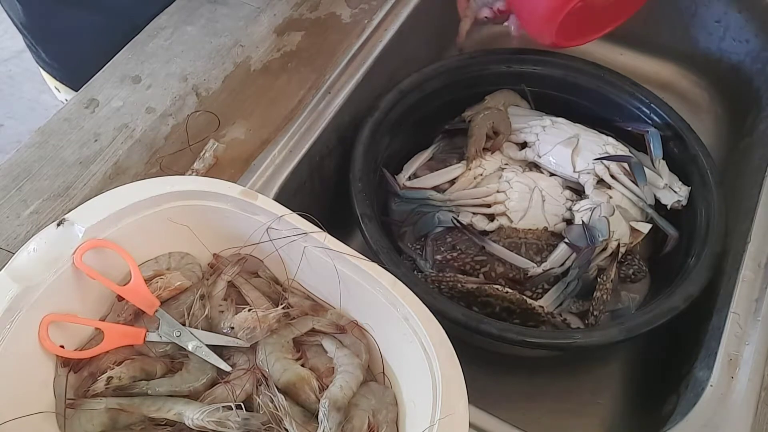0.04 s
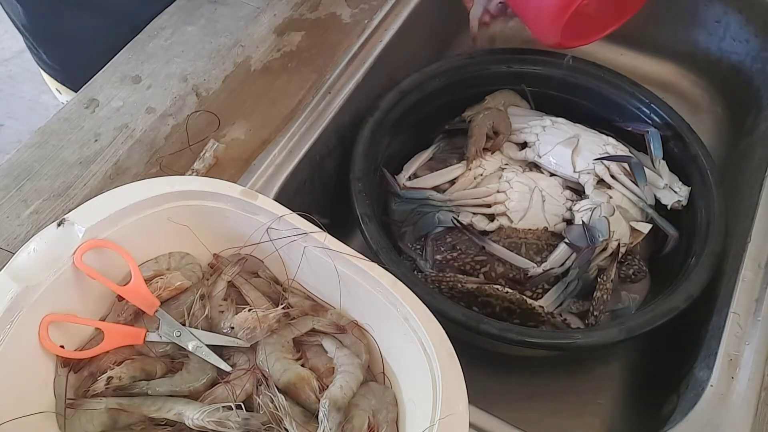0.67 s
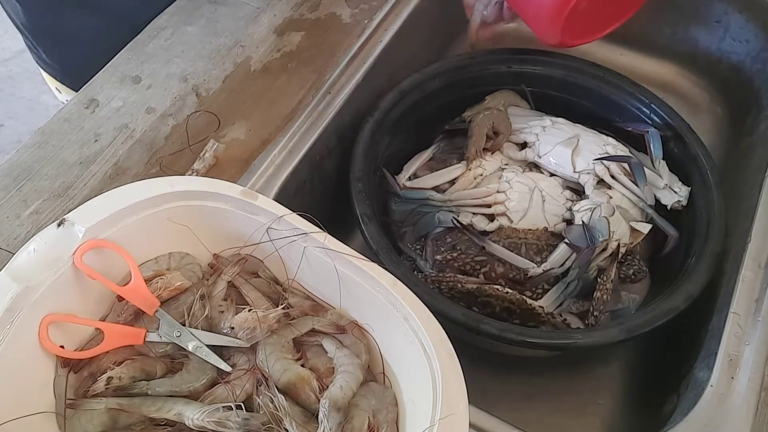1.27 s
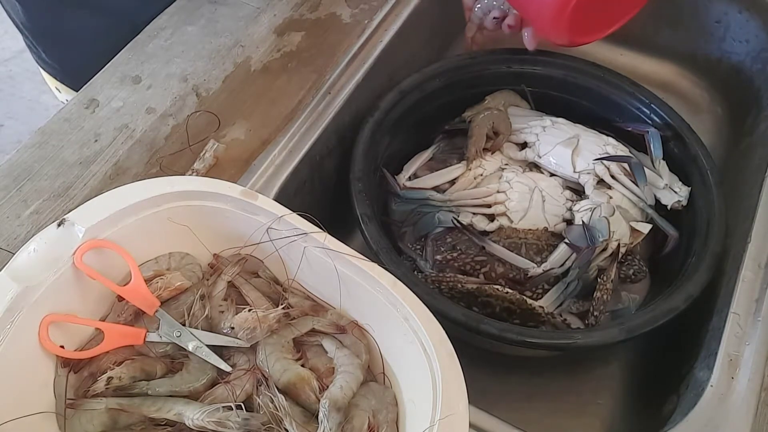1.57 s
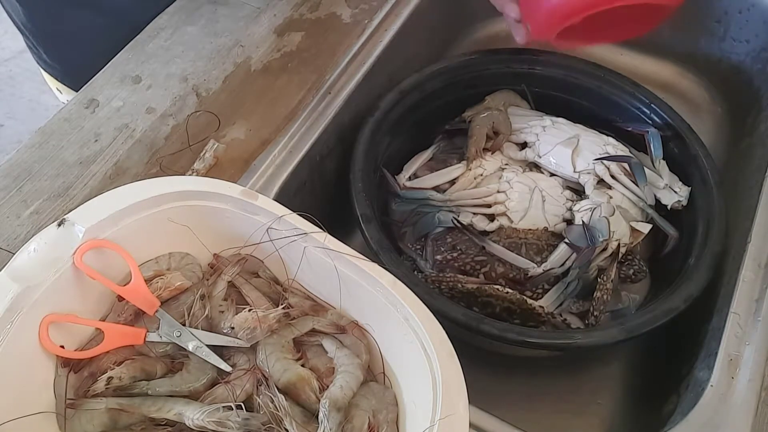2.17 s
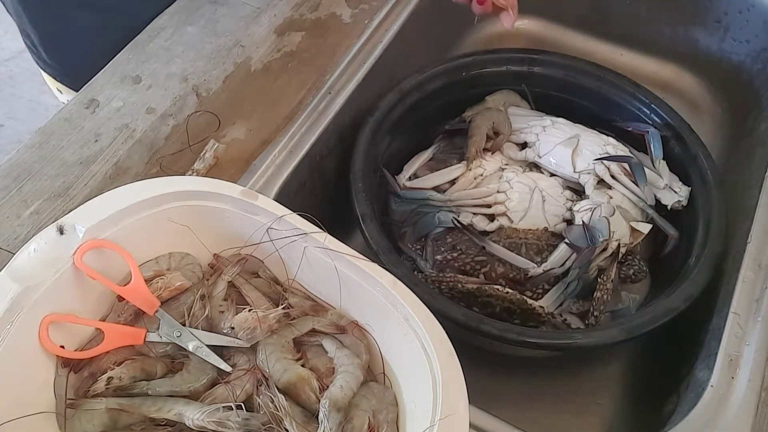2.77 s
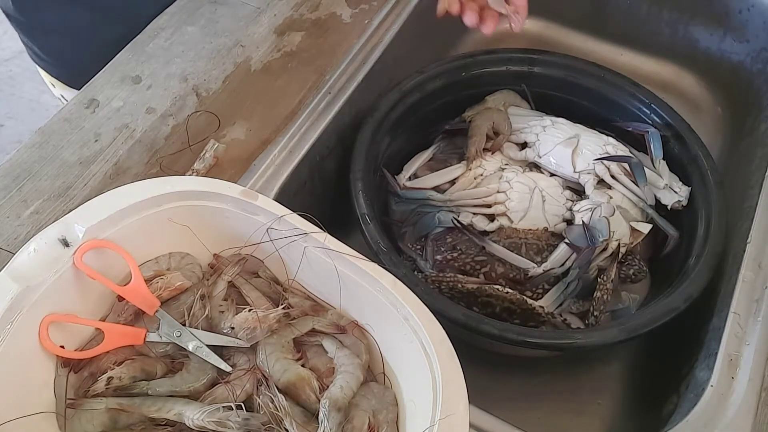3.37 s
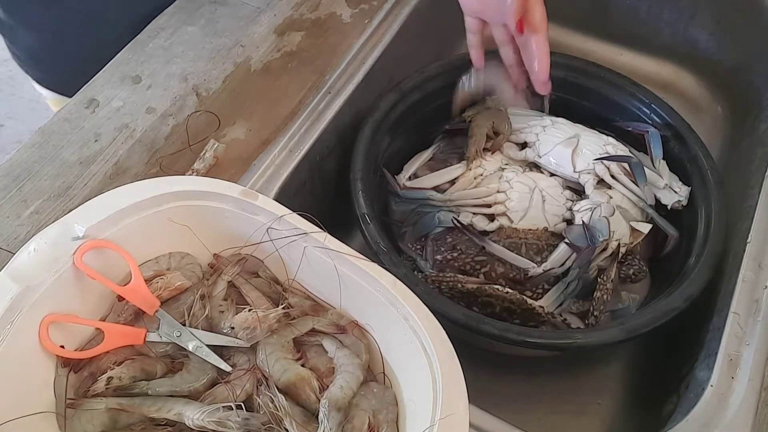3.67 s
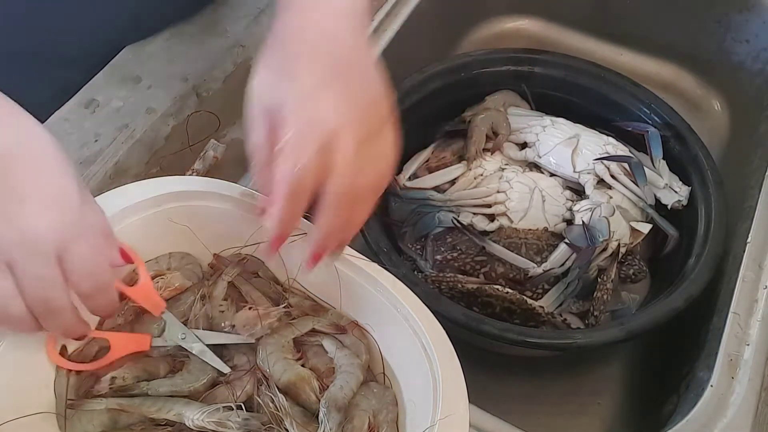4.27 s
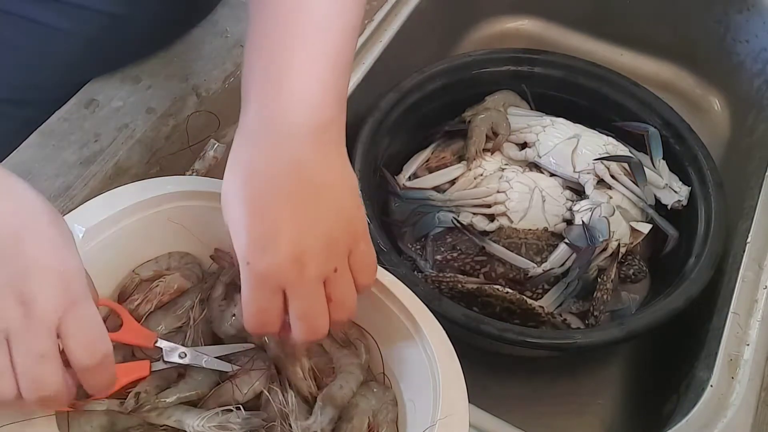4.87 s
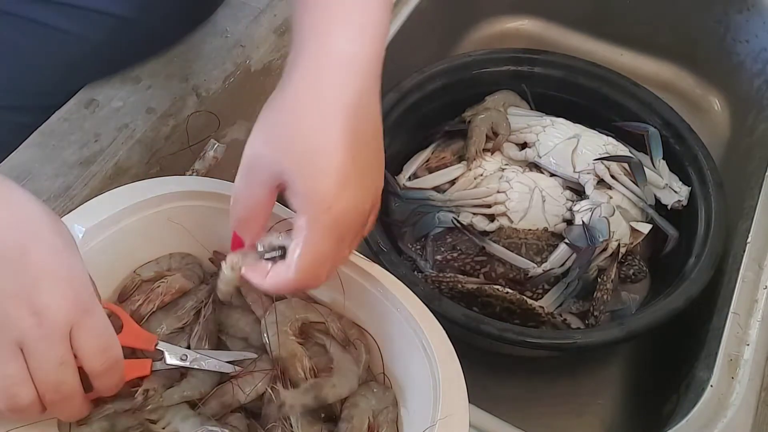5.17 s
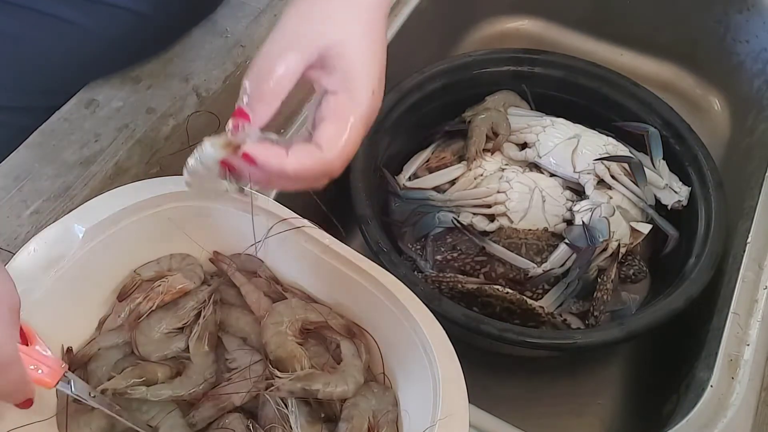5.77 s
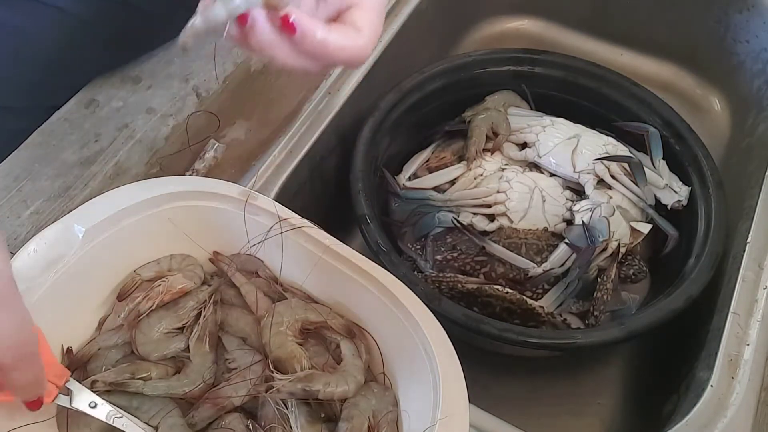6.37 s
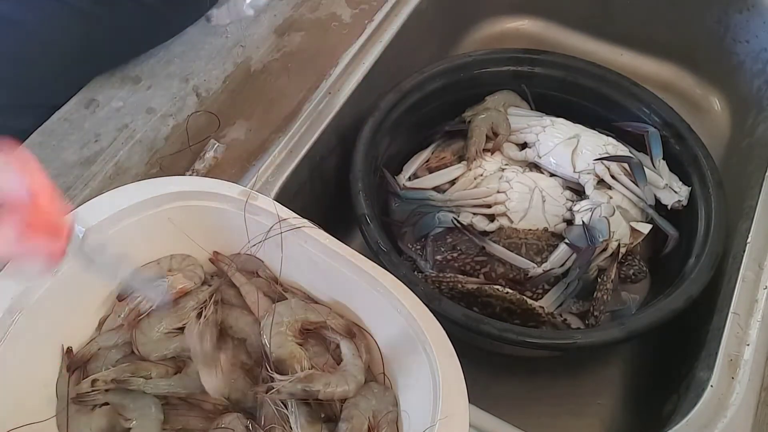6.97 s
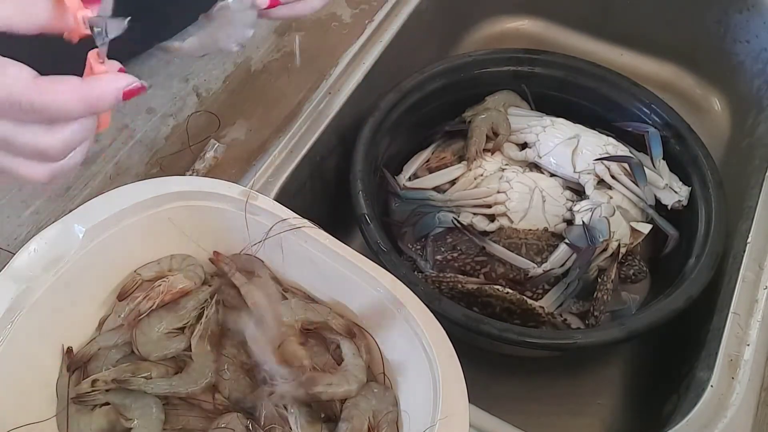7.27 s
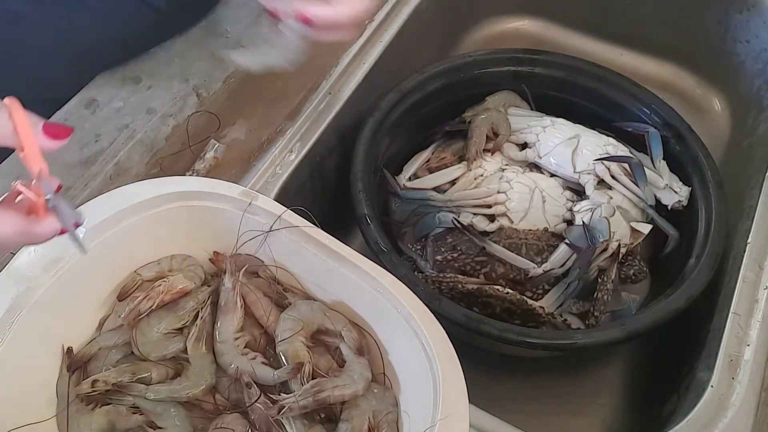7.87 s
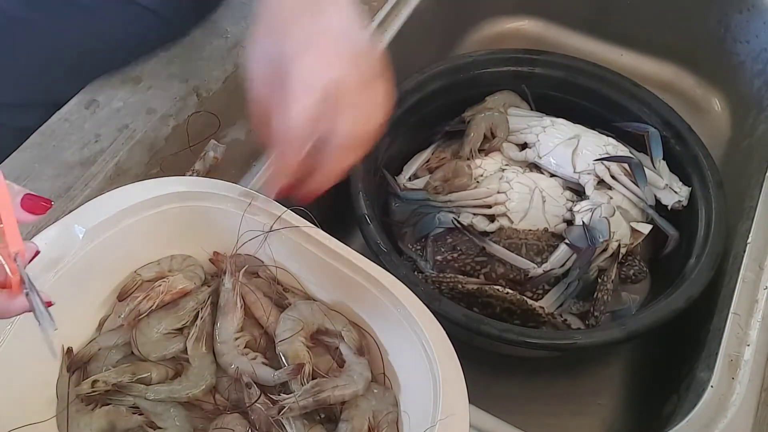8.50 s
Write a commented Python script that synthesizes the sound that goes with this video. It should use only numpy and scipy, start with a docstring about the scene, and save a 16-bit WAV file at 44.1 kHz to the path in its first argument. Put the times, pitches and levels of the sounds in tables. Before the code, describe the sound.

Water is poured in short gushes over a bowl of crabs, splashing, dripping and drumming in a steel sink. The plastic scoop is set down with a hollow, bouncing clatter. Hands then pick through wet shellfish, making soft crackles, slaps and faint squeaks, while scissors tap a plastic tub and the basin booms softly. It is heard close up in a quiet, half-open kitchen.

```python
"""Water drums and splashes in a steel sink, poured in gushes from a plastic scoop. The scoop is set down with a
hollow clatter. Then hands pick through wet shellfish in a plastic tub: shells crackle and slap, fingers rub,
scissors tap the tub, the basin booms softly when nudged. Steel and plastic ring in damped modes, drops ring as
bubbles, spray and shells are many tiny impacts. Close phone, half-open kitchen."""
import sys
import numpy as np
from scipy import signal
from scipy.fft import rfft, irfft
from scipy.io import wavfile
from scipy.ndimage import uniform_filter1d

SR = 44100
rng = np.random.default_rng(int(sys.argv[2]) if len(sys.argv) > 2 else 0)


def int16_out(signal):
    """Quantize to a 16-bit WAV file."""
    q = np.round(np.clip(np.atleast_2d(signal).T, -1, 1) * 32767)
    wavfile.write(sys.argv[1], SR, q.astype(np.int16))


N = 380890
T = np.arange(N) / SR
RING_T = T[:SR // 2]
POUR_END_S = 2.4

# water gushes: (time [s], length [s], drumming [dB], spray [dB], basin boom [dB])
GUSHES = [(0.01, 0.084, -44, -50, -39), (0.19, 0.11, -42, -45.5, -32.5), (0.38, 0.07, -42, -64, -35.5),
          (0.54, 0.046, -40, -53.5, -34), (0.682, .2, -40.5, -66.5, -28.5), (0.773, 0.012, -45, -41, -39),
          (1.018, 0.1, -44, -64.5, -42), (1.216, .09, -49, -55.5, -43), (1.359, 0.034, -46, -63.5, -39.5),
          (1.523, 0.036, -42, -56, -43.5), (1.79, 0.037, -48.5, -65.5, -49), (1.915, 0.11, -44.5, -73, -49),
          (2.144, 0.035, -37.5, -51, -42), (2.25, 0.16, -38.5, -61, -44.5)]
# steel sink floor: (frequency [Hz], level [dB], t60 [s])
FLOOR_MODES = [(168, -13.5, .15), (236, -14.5, 0.31), (279, 2.5, 0.34), (270, -0.5, .15), (329, -6, 0.13),
               (391.7, -9, 0.17), (431, -13, 0.41)]
# wet shell noise: (frequency [Hz], level [dB])
SHELL_SPECTRUM = [(120, -37.5), (280, -9.5), (430, -8.5), (620, -13), (1100, -6), (1800, -4.5),
                  (2600, -1.5), (3400, -5.5), (4500, -6), (6000, -13), (9000, -15.5), (14000, -21),
                  (16000, -27.5)]
# plastic tub walls: (frequency [Hz], level [dB], t60 [s])
TUB_MODES = [(310, -11, 0.18), (469, -3, 0.12), (686, -2, 0.11), (1630, -0.5, 0.032), (1820, -1.5, 0.092),
             (1938, 0, 0.063), (2000, -11.5, 0.11), (2070, -2, 0.11), (2420, -11.5, 0.14),
             (2695, -1, 0.053), (2960, -13, 0.097), (4410, -4, 0.038), (5220, -27, 0.032)]


def undb(db):
    """Decibels to gain."""
    return 10 ** (np.asarray(db) / 20)


def unit(x):
    """Scale to rms 1."""
    return x / np.sqrt(np.mean(x ** 2))


def pan(db):
    """Stereo gains for a left-minus-right level."""
    return undb(np.array([[.5], [-.5]]) * db)


def add(out, time_s, x):
    """Mix x into out at time_s."""
    i = int(time_s * SR)
    out[:, i:i + x.shape[1]] += x[:, :N - i]


def convolve(x, response):
    """Apply an impulse response, keeping the length."""
    return signal.fftconvolve(np.atleast_2d(x), np.atleast_2d(response), axes=1)[:, :x.shape[-1]]


def colour(x, spectrum):
    """Minimum-phase filter through (Hz, dB) points; white noise keeps its power."""
    size = 4096
    hz, db = np.transpose(spectrum)
    bins_hz = np.fft.rfftfreq(size, 1 / SR)
    gain = unit(undb(np.interp(np.log(bins_hz + 1), np.log(hz), db)))
    cepstrum = irfft(np.log(gain))[:size // 2]
    cepstrum[1:] *= 2
    return convolve(x, irfft(np.exp(rfft(cepstrum, size))))


def band(x, lo_hz, hi_hz):
    """Band-pass."""
    sos = signal.butter(3, [lo_hz, min(hi_hz, SR * 4 / 9)], "band", fs=SR, output="sos")
    return signal.sosfilt(sos, x)


def fade(t60_s):
    """Exponential decay."""
    return np.exp(-np.log(1000) * RING_T / t60_s)


def burst(t60_s):
    """Decaying stereo noise."""
    return rng.standard_normal((2, len(RING_T))) * fade(t60_s)


def ring(modes, spread_db=0, detune=0):
    """Struck body, peak 1; mode levels and pitches can vary per blow."""
    y = 0
    for hz, db, t60_s in modes:
        level_draw, pitch_draw = rng.standard_normal(2)
        tone = np.sin(2 * np.pi * hz * (1 + detune * pitch_draw) * RING_T)
        y = y + undb(db + spread_db * level_draw) * fade(t60_s) * tone
    return y / np.abs(y).max()


def walk(rate_hz):
    """Slow random wander, rms 1."""
    hold = int(SR / rate_hz)
    steps = np.repeat(rng.standard_normal(N // hold + 1), hold)
    return unit(uniform_filter1d(steps, hold)[:N])


def grains(per_s, scatter_db):
    """Random tiny impacts, most weak, a few strong."""
    size = undb(scatter_db * np.minimum(rng.exponential(size=N), 4))
    return unit((rng.random(N) < per_s / SR) * size * rng.choice([-1, 1], N))


def crackle(per_s, scatter_db, t60_s, patchy_db):
    """Impacts as stereo noise puffs; each band adds its own impacts and level wander."""
    edges_hz = [100, 900, 1600, 2800, 5000, 9000, 17000]
    pole = np.exp(-2 * np.log(1000) / (t60_s * SR))
    shared, out = grains(per_s, scatter_db) ** 2, 0
    for lo_hz, hi_hz in zip(edges_hz, edges_hz[1:]):
        power = signal.lfilter([1], [1, -pole], shared + grains(per_s, scatter_db) ** 2)
        noise = rng.standard_normal((2, N))
        envelope = unit(np.sqrt(power) * undb(patchy_db * walk(35)))
        out = out + band(noise * envelope, lo_hz, hi_hz)
    return out


def swells(starts_s, lengths_s, levels_db, rise_s, fall_s, sag_db_per_s=0):
    """Gain of overlapping swells: each rises to its start, holds or sags, falls; ramps span 60 dB."""
    t, power = T[::32], 1e-12
    for start_s, length_s, db in zip(starts_s, lengths_s, levels_db):
        ramps = np.maximum(start_s - t, 0) / rise_s + np.maximum(t - start_s - length_s, 0) / fall_s
        sag_db = sag_db_per_s * np.maximum(t - start_s, 0)
        power = power + undb(db - sag_db - 60 * ramps) ** 2
    return np.interp(T, t, np.sqrt(power))


def steady(x, window_s):
    """Even out slow swells to rms 1."""
    power = np.mean(np.atleast_2d(x) ** 2, axis=0)
    return x / np.sqrt(uniform_filter1d(power, int(window_s * SR)) + 1e-9)


def brighten(x, gain, treble_gain, pan_db):
    """Separate gains below and above 6.5 kHz; only the treble is panned."""
    low = signal.sosfilt(signal.butter(4, 6500, fs=SR, output="sos"), x)
    return gain * unit(low) + treble_gain * pan(pan_db) * unit(band(x, 6500, 17000))


def room(x, near_db, far_db):
    """Dense sink-wall reflections and a short room tail, different per channel."""
    near, far = burst(0.059), burst(0.16) * (1 - fade(0.017))
    response = (undb(near_db) * unit(near) + undb(far_db) * unit(far)) / np.sqrt(len(RING_T))
    response[:, 0] += 1
    return convolve(x, response / np.sqrt(np.sum(response ** 2) / 2))


def bubble(hz, cycles, rise):
    """Trapped air rings briefly, rising in pitch."""
    life_s = cycles / hz
    pitch_hz = hz * (1 + rise * (1 - fade(2 * life_s)))
    return fade(life_s) * (1 - fade(life_s / 4)) * np.sin(2 * np.pi * np.cumsum(pitch_hz) / SR)


def bubbles(count, lo_hz, hi_hz, cycles, scatter_db):
    """Bubbles of random size, rms 1 over the pour."""
    out = np.zeros((1, N))
    for when, pitch, strength in rng.random((count, 3)):
        tone = bubble(lo_hz * (hi_hz / lo_hz) ** pitch, cycles, rise=0.18)
        add(out, when * POUR_END_S, undb(scatter_db * strength ** 2) * tone[None])
    return out / np.sqrt(np.sum(out ** 2) / (POUR_END_S * SR))


def pouring():
    """Gushes drum on the steel, gurgle and throw spray; the mist thins as the scoop empties."""
    # spray: (frequency [Hz], level [dB])
    spray_spectrum = [(300, -4.5), (600, 1.5), (1000, -1.5), (2300, 2), (3100, -4), (4000, -1.5),
                      (7000, -14), (13000, -13), (16000, -15)]
    # faint tones as the pour begins: (frequency [Hz], level [dB])
    whine_tones = [(694, -53), (1357, -58), (1571, -70), (2799, -62), (4203, -61.5)]
    starts_s, lengths_s, drum_db, spray_db, _ = np.transpose(GUSHES)
    drum = unit(band(convolve(grains(per_s=500, scatter_db=5), ring(FLOOR_MODES)), 130, 620))
    gurgle = bubbles(count=110, lo_hz=256, hi_hz=415, cycles=47, scatter_db=3.5)
    drum_gain = swells(starts_s, lengths_s, drum_db, rise_s=0.19, fall_s=0.33)
    drum = steady(drum + undb(-9) * gurgle, window_s=.08) * drum_gain * pan(-5)

    spray_gain = swells(starts_s, lengths_s, spray_db, rise_s=0.12, fall_s=0.49)
    mist_gain = swells([0], [POUR_END_S], [-57], rise_s=0.12, fall_s=0.49, sag_db_per_s=5)
    spray = colour(crackle(per_s=900, scatter_db=4.5, t60_s=0.048, patchy_db=3.5), spray_spectrum)
    spray = brighten(spray, spray_gain, np.hypot(mist_gain, undb(-7.5) * spray_gain), pan_db=-6)
    spatter = bubbles(count=120, lo_hz=3000, hi_hz=13000, cycles=35, scatter_db=15)
    spatter = undb(-8.5) * mist_gain * room(spatter, near_db=-1, far_db=-5) * pan(-4)

    whine = 0
    for hz, db in whine_tones:
        gain = undb(db + 2 * walk(5.4))
        pitch_hz = hz * (1 + 0.0033 * walk(27))
        whine = whine + gain * np.sin(2 * np.pi * np.cumsum(pitch_hz) / SR)
    return drum + spray + spatter + whine * np.interp(T, [.3, .42], [.8, 0])


def trickle():
    """Sharp droplets tick through the pour, then faintly in the wet shells."""
    ticks = band(crackle(per_s=110, scatter_db=6.5, t60_s=.012, patchy_db=4), 4900, 16000)
    level_db = np.interp(T, [0, 1, 2.1, 2.6, 3.7, 8.6], [-63.5, -63, -67.5, -73.5, -77, -102])
    return unit(ticks) * pan(-10) * undb(level_db)


def background():
    """Quiet outdoor air, a narrow hiss that comes and goes, microphone noise."""
    # outdoor air: (frequency [Hz], level [dB])
    air_spectrum = [(15, -42), (25, -13), (55, 2), (81, 0), (206, -20.5), (450, -20.5), (579, -35),
                    (1070, -38), (1860, -27), (2400, -36), (3160, -33), (6000, -36.5), (7800, -54),
                    (13200, -120)]
    # microphone noise: (frequency [Hz], level [dB])
    mic_spectrum = [(2500, -8.5), (5000, -6), (7500, -1), (9100, 10), (10200, -5.5), (13000, 2.5),
                    (16000, -3)]
    # spells of narrow hiss: (time [s], length [s], level [dB])
    hiss_spells = [(4.713, .3, -60.5), (5.539, 2.2, -52.5), (8.055, .55, -64)]
    # narrow hiss: (frequency [Hz], level [dB])
    hiss_spectrum = [(400, -16), (750, -11.5), (1300, -20.5), (1640, -10), (1830, 3), (2040, -1),
                     (2330, -14), (4000, -20.5), (8000, -28), (15000, -25.5)]
    air = colour(rng.standard_normal((2, N)) + rng.standard_normal(N), air_spectrum)
    hiss = colour(crackle(per_s=470, scatter_db=1.5, t60_s=0.035, patchy_db=-1), hiss_spectrum)
    hiss *= swells(*np.transpose(hiss_spells), rise_s=0.035, fall_s=.6, sag_db_per_s=13.5)
    air = unit(air) * undb(-61 + walk(3.5))
    mic_noise = undb(-66.5) * colour(rng.standard_normal((2, N)), mic_spectrum)
    return air + hiss + mic_noise


def sink():
    """Gushes and nudges boom the basin's lowest modes; firmer blows ring its floor."""
    # steel basin: (frequency [Hz], level [dB], t60 [s])
    basin_modes = [(68.93, 3, .45), (75, -2, 0.78), (90, -11, 0.39), (118, -26.5, .15), (155, -20.5, .12)]
    # arms against the basin: (time [s], length [s], level [dB], left minus right [dB])
    nudges = [(2.045, 0.12, -38.5, -0.5), (2.42, 0.47, -43.5, 2), (3.064, 0.35, -45.5, 1.5),
              (3.242, 0.032, -40.5, 11), (3.817, 0.021, -44, 15), (4.544, 0.38, -48, -3.5),
              (4.731, 0.04, -39, 24), (5.14, 0.055, -46, -7), (6.249, 0.084, -48, 27),
              (6.308, 0.028, -41.5, 20), (7.21, 0.022, -48, -2), (8.053, .36, -58.5, -4),
              (8.47, 0.041, -46, -3)]
    # dull blows on the floor: (time [s], level [dB])
    thumps = [(0.127, -23), (0.377, -25.5), (1.551, -45), (2.162, -25), (2.363, -33.5), (2.631, -23)]
    ramps = dict(rise_s=0.27, fall_s=.36)
    starts_s, lengths_s, _, _, boom_db = np.transpose(GUSHES)
    water_gain = swells(starts_s, lengths_s, boom_db, **ramps) * pan(7.8)
    starts_s, lengths_s, level_db, pan_db = np.transpose(nudges)
    arm_gain = [swells(starts_s, lengths_s, level_db + side * pan_db / 2, **ramps) for side in (1, -1)]
    booms = [convolve(grains(per_s=300, scatter_db=4), ring(basin_modes)) for _ in range(2)]
    common, apart = (steady(band(boom, 48, 190), window_s=0.087) for boom in booms)
    out = (common + undb(-8.5) * apart * np.array([[1], [-1]])) * np.hypot(water_gain, arm_gain)
    for time_s, db in thumps:
        thump = ring(FLOOR_MODES, spread_db=0.85) * (1 - fade(0.026))
        add(out, time_s, undb(db) * thump * pan(-0.5))
    return out


def drops():
    """Each drop ticks and rings a tiny bubble."""
    # single drops: (time [s], level [dB], starting pitch [Hz])
    drips = [(0.0407, -25.5, 3420), (0.2744, -32, 3430), (0.3767, -24, 4840), (0.532, -25, 13500),
             (0.7068, -19, 8700), (0.991, -27, 5700), (1.019, -26, 9000), (1.158, -41.5, 3260),
             (1.22, -31, 11600), (1.2935, -23, 8200), (1.4, -32, 4750), (1.6382, -31, 12900),
             (1.973, -32, 9900)]
    out = np.zeros((2, N))
    for time_s, db, hz in drips:
        tick = band(burst(0.025), 0.54 * hz, 1.6 * hz)
        plink = bubble(hz, cycles=47, rise=0.15)
        add(out, time_s, undb(db - 1) * pan(-2.5) * (0.75 * plink + 0.32 * tick))
    return room(out, near_db=-3, far_db=-7)


def slaps():
    """Splashes and wet shell slaps: a burst of spray and a smack of trapped air."""
    # slaps: (time [s], level [dB], treble tilt [dB], t60 [s], smack [dB], left minus right [dB])
    hits = [(0.153, -30, -4, 0.055, -16, -2), (0.372, -37, 19, 0.19, -17, -5),
            (0.553, -45.5, 9, 0.31, -20, -1), (0.798, -20.5, 2.5, 0.09, 12, 0),
            (3.864, -40.5, 5, 0.12, 2, 0), (3.923, -38.5, 9, 0.12, -6, -2),
            (3.996, -33.5, -4, 0.061, -11, -2), (4.07, -32.5, 0, 0.093, 0, 2),
            (4.166, -37, -13, 0.18, -5, -12), (4.212, -25.5, 1.5, 0.2, 4, -2),
            (4.254, -18, 3.5, 0.084, 15.5, .5), (5.066, -33.5, 15, 0.24, 13, -3),
            (5.205, -29.5, 7.5, 0.2, -10, -2.5), (6.974, -34, 4, 0.39, 1, -2),
            (7.167, -32.5, 3, 0.37, 12, -6), (7.216, -15, 12, 0.048, 11, 0.5),
            (8.196, -30.5, 9.5, 0.096, -12, -5)]
    out = np.zeros((2, N))
    impulse, attack = np.eye(1, 512), 1 - fade(.007)
    for time_s, db, treble_db, t60_s, smack_db, pan_db in hits:
        spray = colour(burst(t60_s), SHELL_SPECTRUM)
        tilt = colour(impulse, [(3000, -treble_db), (9000, 0)]) * undb(treble_db / 2)
        smack = undb(smack_db) * band(burst(0.082), 1540, 2330)
        add(out, time_s, undb(db - 5.5) * pan(pan_db) * (convolve(spray, tilt) + smack) * attack)
    return room(out, near_db=4, far_db=0.5)


def in_tub(x):
    """Sound in the tub also rings its walls."""
    walls = np.array([unit(ring(TUB_MODES, spread_db=2, detune=.015)) for _ in range(2)])
    return x + undb(-16) * convolve(x, walls / np.sqrt(len(RING_T)))


def rubs():
    """Wet fingers and shells squeak: slips ring one resonance, quick to start, slower to stop."""
    # strokes: (time [s], length [s], level [dB], resonance [Hz])
    strokes = [(1.306, 0.1, -56, 1070), (3.355, 0.15, -56.5, 1910), (4.895, 0.048, -51, 366),
               (4.9, 0.063, -41, 1900), (4.961, 0.094, -44.5, 1910), (4.985, 0.071, -54, 1050),
               (5.139, 0.14, -49, 746), (5.522, 0.039, -52.5, 778), (5.545, 0.033, -45, 1930),
               (5.65, 0.064, -54, 1060), (5.884, 0.077, -55.5, 720), (8.398, 0.18, -44, 1224),
               (8.401, 0.2, -43.5, 1790), (8.411, 0.18, -48.5, 421)]
    out = np.zeros((2, N))
    for time_s, length_s, db, hz in strokes:
        slips = rng.standard_normal((2, len(RING_T)))
        squeak = signal.lfilter(*signal.iirpeak(hz, Q=11, fs=SR), slips)
        envelope = np.interp(RING_T / length_s, [0, .15, .7, 1.2], [0.27, 0.44, 0.39, 0])
        add(out, time_s, undb(db) * unit(band(squeak, 0.763 * hz, 1.027 * hz)) * envelope)
    return out


def scoop():
    """The hollow scoop lands, bounces and rocks to rest; its soft wall swings up over a few cycles."""
    # contacts: (time [s], level [dB], relative crack [dB], left minus right [dB])
    knocks = [(2.258, -24.5, 2.5, -8), (2.272, -25, -10, -6), (2.327, -3.5, -4, -7), (2.362, -13.5, 3, 8),
              (2.376, -14, -3, -13), (2.404, -17.5, -10, 1), (2.437, -23, -2, -9), (2.489, -34.5, -2, 1),
              (2.654, -31.5, -10, -4), (2.741, -43, 8.5, 0), (2.843, -23.5, -11.5, -0.5),
              (2.871, -34, 1, 8), (2.921, -39.5, -3, -5), (3.026, -35.5, 14.5, -1), (3.054, -37.5, 12, -17),
              (3.076, -31.5, 4.5, 2), (3.299, -39, 6.5, 0)]
    # free scoop: (frequency [Hz], level [dB], t60 [s])
    hollow_modes = [(504, -14.5, 0.32), (608, 5, 0.15), (665, -7.5, .22), (688, -2.5, 0.36), (734, 0, .26),
                    (761, -4, 0.37), (780, -2.5, 0.26), (930, -14, 0.14), (1207, -20.5, 0.18),
                    (1910, -19.5, .12), (1900, -19, .12), (2470, -27, .1), (2850, -22, .12),
                    (3714, -22.5, 0.074)]
    # wall damped against the steel: (frequency [Hz], level [dB], t60 [s])
    clunk_modes = [(645, -1, 0.055), (726, 4, 0.054), (1860, -17, 0.043)]
    # contact crack: (frequency [Hz], level [dB])
    crack_spectrum = [(150, -22), (450, -6), (750, 8), (1400, -11), (1900, 1.5), (2400, -10.5), (3600, -12),
                      (5500, -24.5), (9000, -36), (16000, -44)]
    body, cracks = np.zeros((2, 2, N))
    for time_s, db, crack_db, pan_db in knocks:
        hollow = ring(hollow_modes, spread_db=1.5, detune=.006) * (1 - fade(0.018))
        clunk = ring(clunk_modes, detune=.02) * (1 - fade(.02))
        reflections = unit(band(burst(.12), 610, 880)) / unit(fade(0.065)).max()
        knock = undb(-2.5) * hollow + undb(4) * clunk + undb(-14) * reflections
        attack = 1 - fade(.003 * undb(-crack_db))  # less crack: softer, longer contact
        add(body, time_s, undb(db) * knock * attack * pan(pan_db - 2))
        add(cracks, time_s, undb(db + crack_db - 9) * colour(burst(0.026), crack_spectrum))
    return room(body, near_db=-23.5, far_db=-21.5) + room(cracks, near_db=-6, far_db=1)


def shells():
    """Fingers rummage: wet shells rub in dense tiny slips and sparser snaps."""
    # handfuls: (time [s], length [s], level [dB], relative treble [dB])
    rummages = [(3.131, .15, -48, -4.5), (3.698, 0.26, -76.5, 9.5), (3.926, 0.14, -52, -7),
                (4.108, 0.2, -46, -9), (4.35, 0.19, -55, -5.5), (4.6, 0.35, -66, 0.5),
                (4.916, 0.11, -61.5, -12), (5.096, 0.022, -40, -2.5), (5.217, 0.013, -46.5, -6),
                (5.923, 0.17, -65, -2.5), (7.008, 0.021, -38, -16), (7.147, 0.093, -41, -7.5),
                (7.419, 0.085, -56.5, -7), (7.69, 0.09, -67, -6.5), (7.941, 0.32, -68, 2),
                (8.198, 0.12, -56, -3.5), (8.41, 0.13, -53.5, -10)]
    starts_s, lengths_s, level_db, treble_db = np.transpose(rummages)
    slips = colour(crackle(per_s=270, scatter_db=0.5, t60_s=0.043, patchy_db=4), SHELL_SPECTRUM)
    snaps = band(crackle(per_s=90, scatter_db=4.5, t60_s=.014, patchy_db=3), 2500, 15000)
    gain = swells(starts_s, lengths_s, level_db, rise_s=0.1, fall_s=0.35)
    treble_gain = swells(starts_s, lengths_s, level_db + treble_db, rise_s=0.1, fall_s=0.35)
    return brighten(unit(slips) + .3 * unit(snaps), gain, treble_gain, pan_db=-6)


def taps():
    """Scissors and hands strike the tub; each tap has its own mix of thud, click and wall ring."""
    # contacts: (time [s], level [dB], thud and click re ring [dB], left minus right [dB])
    contacts = [(3.298, -25, -2, 0), (4.415, -42, 0, -3), (4.901, -42, 0, 1), (5.703, -21.5, -15, -2),
                (6.1178, -15, -3.5, 0), (6.227, -45, -6, -4), (6.275, -36, -6, 1), (6.354, -24, -7, -2)]
    # contact click: (frequency [Hz], level [dB])
    click_spectrum = [(150, -38.5), (500, 1), (950, -9.5), (1800, -4.5), (2700, -5.5), (3400, -12.5),
                      (4500, -12), (7000, -20.5), (12000, -24), (16000, -48)]
    out = np.zeros((2, N))
    impulse, ring_hz = np.eye(1, 512), 1690
    for time_s, db, thud_db, pan_db in contacts:
        click = colour(undb(3) * burst(0.013) + undb(-3) * burst(0.098), click_spectrum)
        # each microphone faces another wall
        walls = np.array([ring(TUB_MODES, spread_db=2, detune=.006) for _ in range(2)])
        touch = colour(impulse, [(ring_hz / 2, thud_db), (ring_hz, 0), (ring_hz * 2, thud_db)])
        touch /= np.abs(rfft(touch)).max()
        tap = convolve(undb(-0.5) * walls + undb(-7) * click, touch)
        add(out, time_s, undb(db) * pan(pan_db) * tap)
    return room(out, near_db=-26, far_db=-7.5)


def scene():
    """Stereo mix at the sink."""
    water = pouring() + trickle() + drops()
    bodies = sink() + scoop() + taps()
    shellfish = in_tub(shells() + slaps()) + rubs()
    return water + bodies + shellfish + background()


def record(dry):
    """Phone passband, 40 Hz to 15.8 kHz."""
    low_cut = signal.sosfilt(signal.butter(3, 40, "high", fs=SR, output="sos"), dry)
    return signal.sosfilt(signal.ellip(10, .2, 80, 15800, fs=SR, output="sos"), low_cut)


dry = scene()
out = record(dry)
int16_out(out)
```